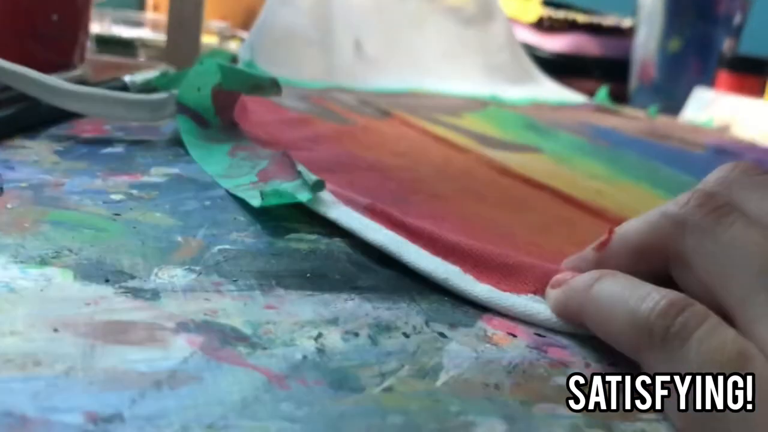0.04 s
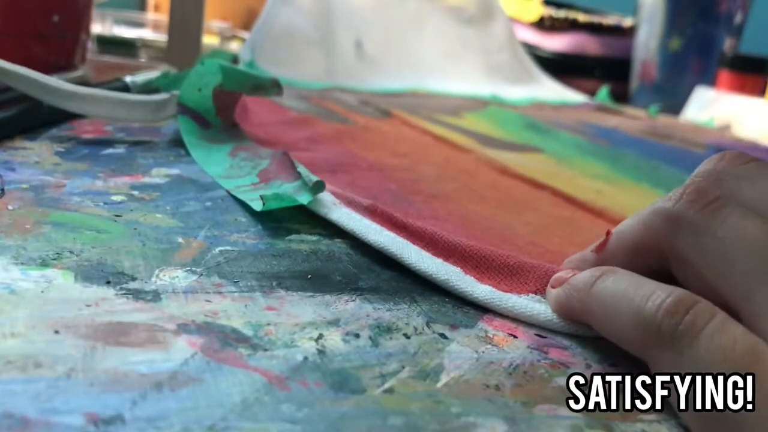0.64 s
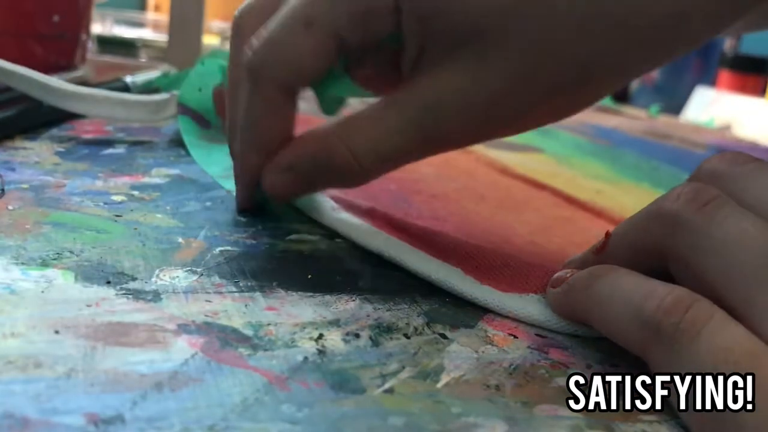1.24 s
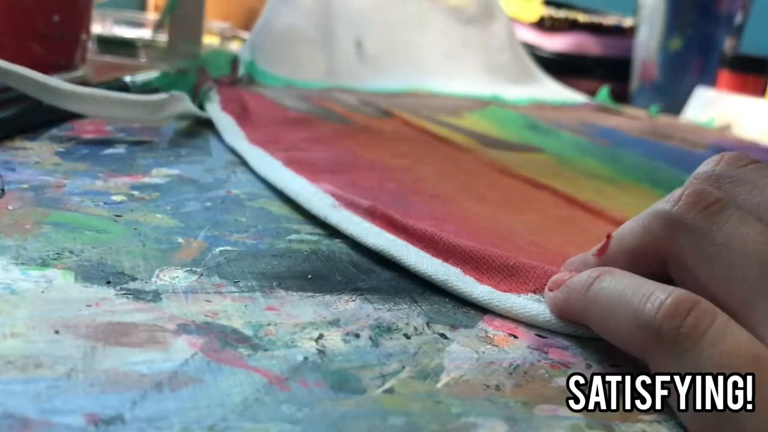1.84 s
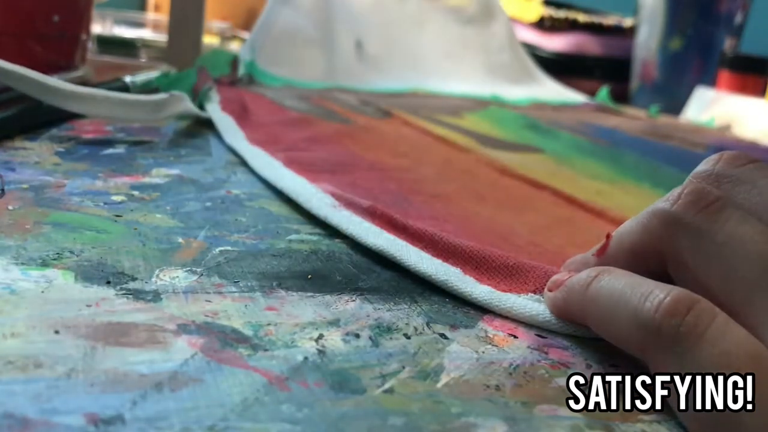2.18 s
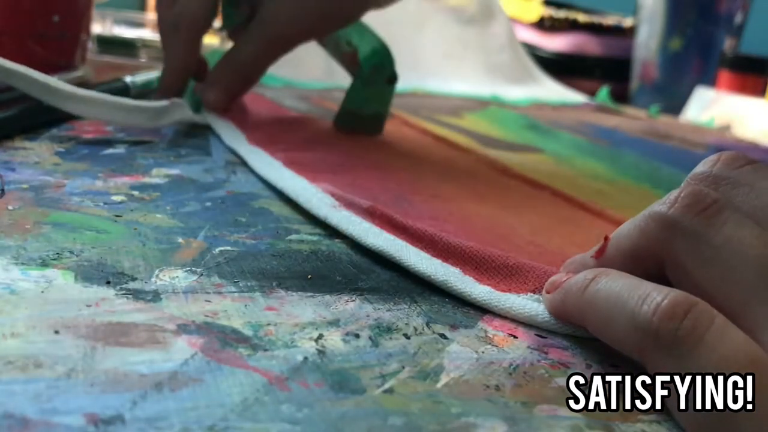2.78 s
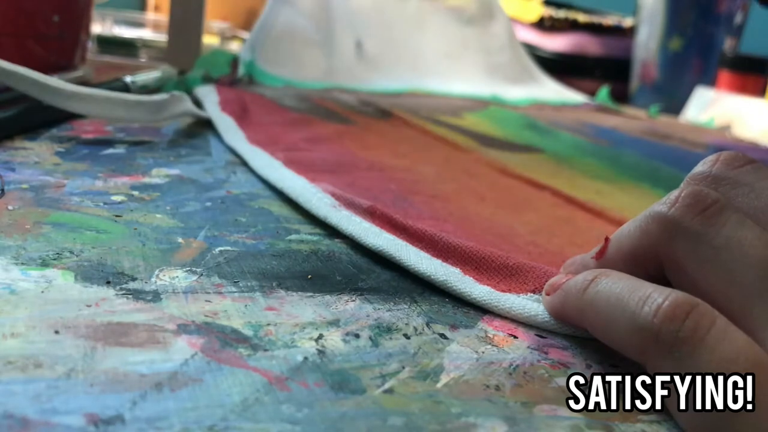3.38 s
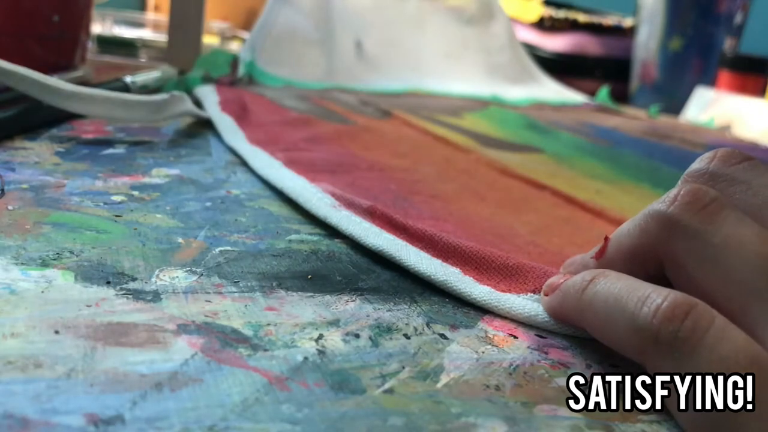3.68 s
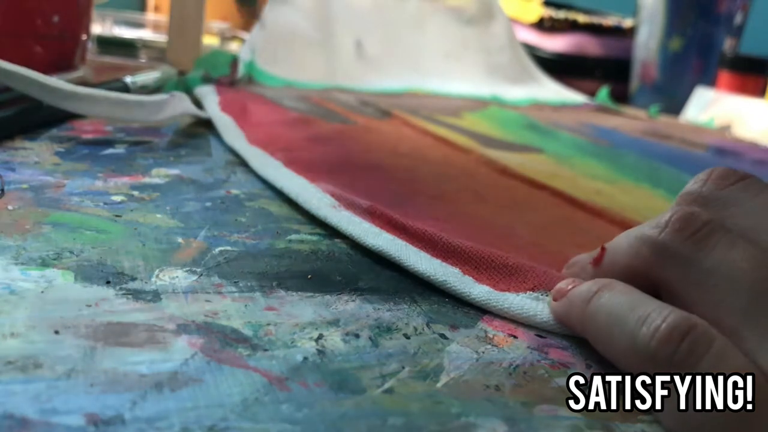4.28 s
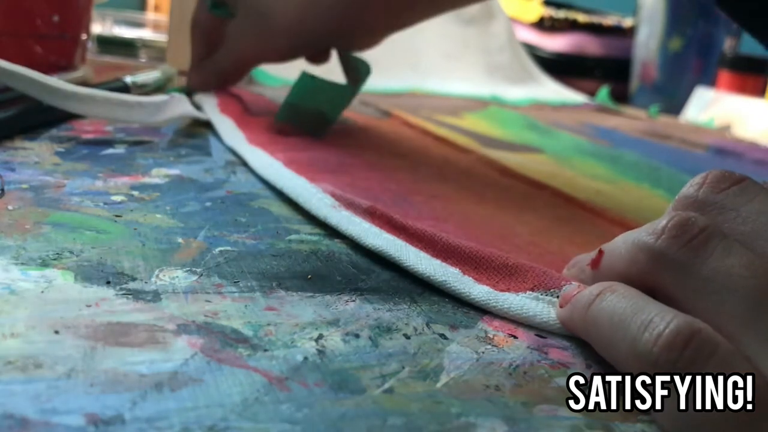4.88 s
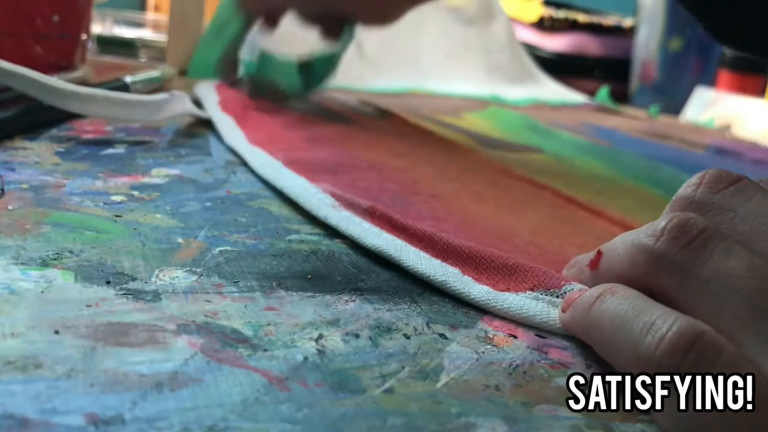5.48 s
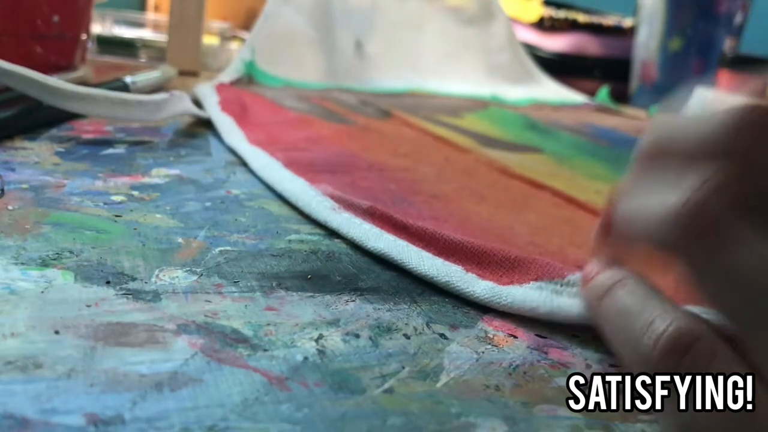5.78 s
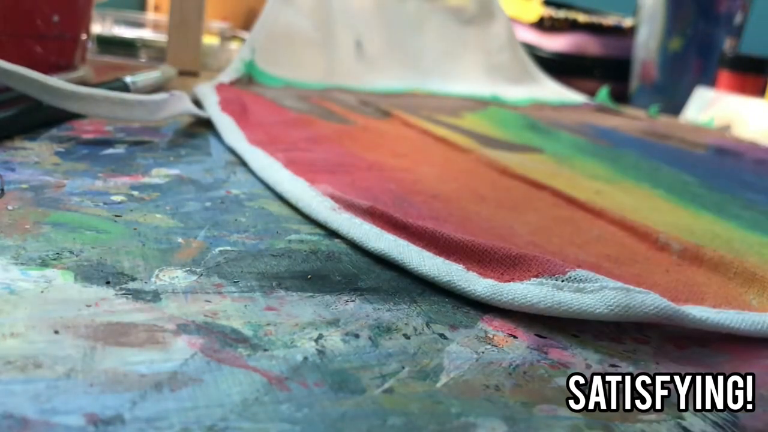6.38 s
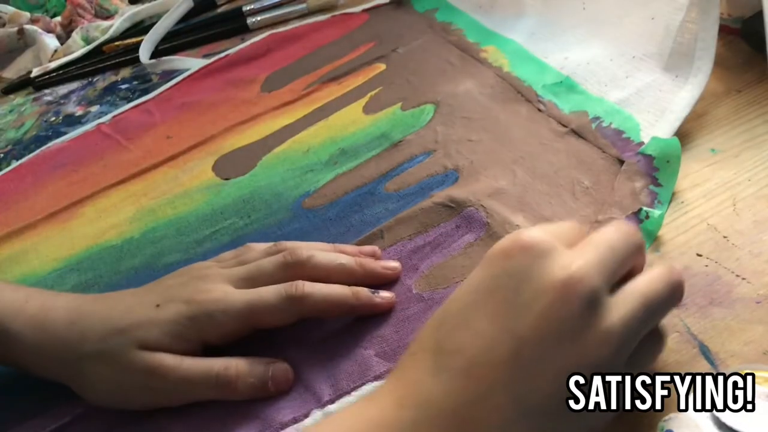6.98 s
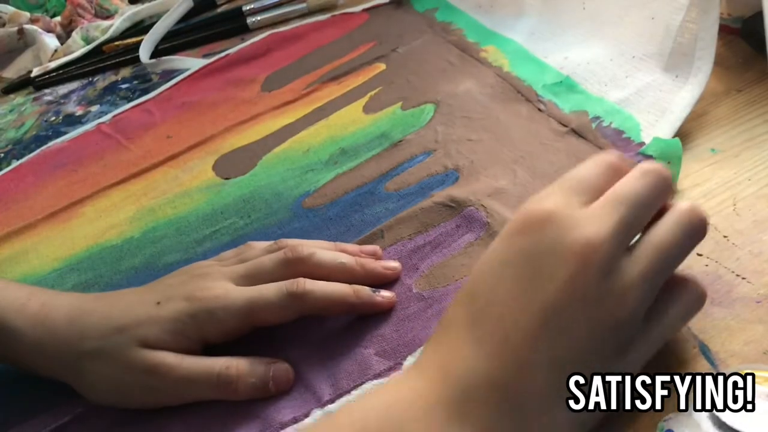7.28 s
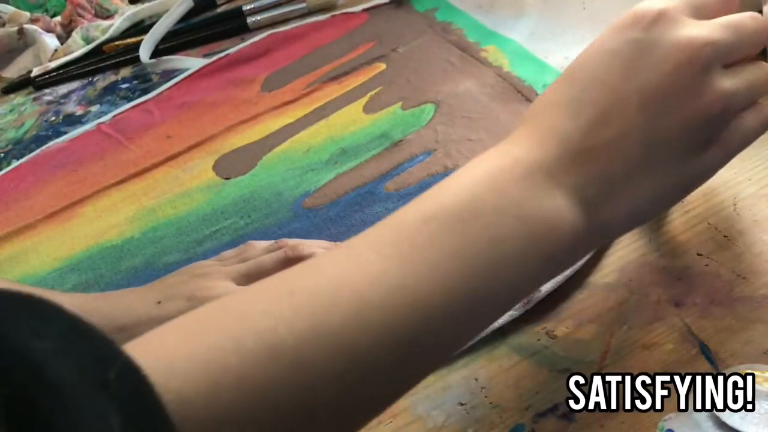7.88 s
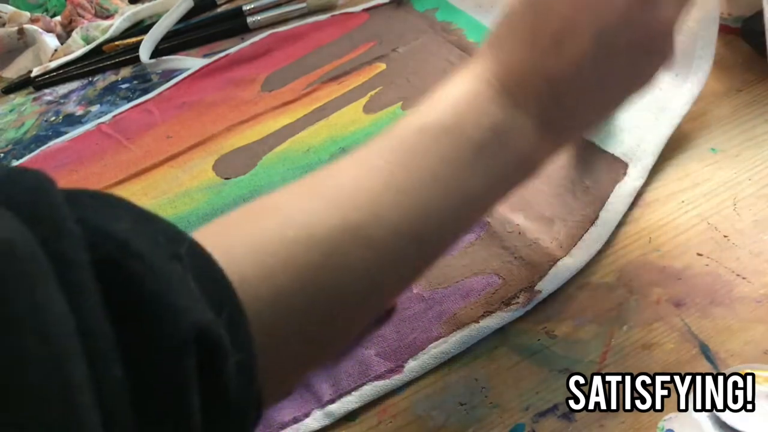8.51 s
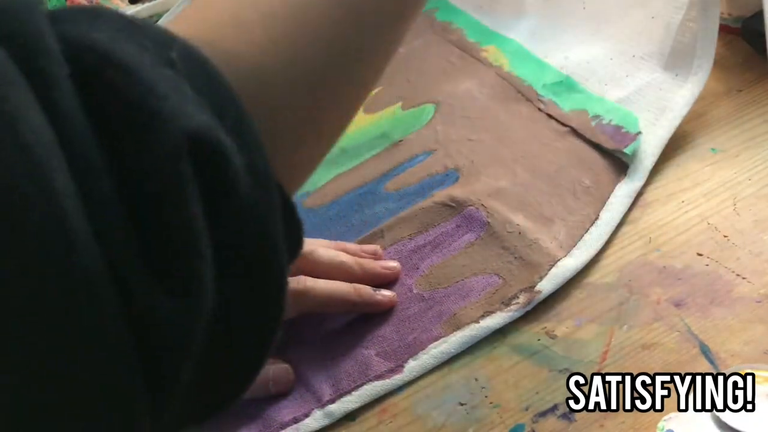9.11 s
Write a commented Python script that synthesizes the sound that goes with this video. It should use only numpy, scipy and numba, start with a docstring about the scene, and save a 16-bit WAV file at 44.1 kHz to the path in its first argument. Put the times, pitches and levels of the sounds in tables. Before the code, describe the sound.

In a quiet room with a low ventilation rumble and hum, masking tape comes off a painted canvas in stop-and-start tugs close to the microphone. Glue and dried paint crackle, the strip snaps crisply, and fingers rub the cloth, tap the canvas and bump the table. About two thirds of the way through, the sound moves farther off: a soft hiss of skin on paint, then a few weak peels and ticks.

```python
"""Scratchy crackle and sharp snaps: masking tape is picked and peeled off a painted canvas on a table.
Glue and dried paint let go in tiny slips; the stiff strip rings and snaps as it buckles.
Fingers rub the cloth, tap the canvas and bump the table, adding hiss and low thuds.
Ventilation and mains hum underlie the quiet room; the last pulls are heard from farther away."""
import sys
import numpy as np
from scipy import signal
from scipy.fft import rfft, irfft
from scipy.io import wavfile
from scipy.ndimage import uniform_filter1d
from numba import njit

SR = 44100
rng = np.random.default_rng(int(sys.argv[2]) if len(sys.argv) > 2 else 0)


def materialize(psi):
    """Save the field psi as 16-bit PCM at rate SR to the path in sys.argv[1].

    A 1-D psi becomes a single channel; in a 2-D psi each row is a channel.
    """
    bounded = np.clip(np.atleast_2d(psi).T, -1, 1)
    quanta = np.round(bounded * 32767).astype(np.int16)
    wavfile.write(sys.argv[1], SR, quanta)


N = 407925
TIME = np.arange(N) / SR

# ventilation spectrum, near spot: freq_hz, relative_db
VENT_NEAR = [(20, -39.5), (38, -9.5), (55, 6), (160, -8), (280, -5.5), (450, -15.5), (900, -19),
             (3000, -26), (16000, -29)]
# ventilation spectrum, far spot: freq_hz, relative_db
VENT_FAR = [(20, -32), (40, -2), (80, 2.5), (300, -7), (500, -15), (2500, -22), (16000, -35.5)]
# mains hum partials: freq_hz, near_db, far_db
MAINS_HUM = [(55.2, -69.5, -74), (120.7, -65, -66.5), (238.7, -68.5, -84.5)]
# hands bump the table through the cloth: start_s, level_db, pitch_hz, t60_s
TABLE_BUMPS = [(0.428, -27, 292, 0.023), (1.001, -39.5, 86, 0.27), (3.106, -41, 100, 0.21),
               (3.999, -46, 67, 0.53), (5.442, -35.5, 101, 0.15), (5.468, -47, 159, 0.37),
               (6.838, -42.5, 152, 0.12), (8.579, -41, 148, 0.068), (8.783, -45.5, 169, 0.088)]
# canvas body spectrum: freq_hz, relative_db
CANVAS_SPECTRUM = [(90, -1.5), (200, 2), (400, -0.5), (550, 1.5), (750, -0.5), (1000, 3), (2400, -4),
                   (4000, -19.5)]
# canvas springs back or is tapped: start_s, level_db
CANVAS_TAPS = [(0.4277, -46.5), (0.9643, -40), (1.868, -34.5), (1.965, -39.5), (3.158, -41.5),
               (3.8977, -48), (4.5624, -43), (8.2519, -53.5), (8.578, -51.5), (8.7794, -59)]
# spectrum of skin on paint: freq_hz, relative_db
SKIN_SPECTRUM = [(900, -7), (1900, 0.5), (5000, -5), (9500, -6), (12500, -2), (16000, -9)]
# envelope of a hand gliding over paint: time_s, level_db
GLIDE_ENVELOPE = [(6.9, -85), (6.99, -66.5), (7.14, -71), (7.21, -57.5), (7.33, -66), (7.8, -72.5),
                  (7.96, -93)]
# fingertip or loose tape end brushes the cloth: centre_s, level_db
CLOTH_BRUSHES = [(.27, -58.5), (.375, -55), (1.078, -49), (1.18, -43), (1.3, -49.5), (2.335, -54),
                 (2.555, -51.5), (2.76, -51), (2.876, -49.5), (3.356, -45.5), (3.579, -46.5), (3.905, -49),
                 (4.507, -52), (5.745, -55), (6.61, -64), (7.89, -63.5), (8.335, -57)]
# hand pulls or slides along the tape: start_s, end_s, scratch_db, swell_db, canvas_db, tilt_db_per_octave
HAND_STROKES = [(0.425, 0.514, -50, -1.5, -60.5, 1), (0.542, 0.704, -41, 13.5, -60.5, 1.5),
                (0.874, 0.934, -43, 3.5, -60.5, 2), (1.395, 1.482, -49, -1, -56.5, 3),
                (1.507, 1.595, -39.5, -1.5, -51.5, -1.7), (1.608, 1.665, -35, 0, -49, -0.5),
                (1.695, 1.86, -37.5, -1, -53, -1), (1.89, 2, -49, 3.5, -57.5, 0),
                (2.102, 2.344, -45.5, -5.5, -63.5, 0), (2.36, 2.558, -57, 7, -71.5, 2.5),
                (3.045, 3.157, -38.5, 3.5, -58.5, -1), (3.295, 3.513, -49, -6.5, -60.5, 0),
                (3.657, 3.799, -47.5, 11.5, -67.5, -0.5), (3.949, 4.133, -45.5, 10.5, -71, 0.3),
                (4.249, 4.302, -48, 5.5, -60, -0.6), (4.665, 4.846, -52.5, -6.5, -67.5, -2.5),
                (4.91, 5.105, -45.5, -1.5, -48, -1), (5.12, 5.287, -52, -4, -82, -0.5),
                (5.32, 5.403, -39.5, -0.5, -49.5, -0.3), (5.427, 5.498, -34, 2, -45.5, -0.5),
                (5.978, 5.998, -43.5, 1, -67, 0), (6.058, 6.405, -50.5, -15, -78, -1),
                (8.156, 8.41, -64.5, 11.5, -79.5, -0.5), (8.446, 8.61, -55.5, -6, -57.5, 0.5),
                (8.635, 8.705, -64.5, -5, -89, 0.2), (9.085, 9.108, -60.5, -3, -71.5, -0.5)]
# strip rings where taut: start_s, end_s, first_hz, last_hz, width_hz, boost_db
# the negative row is a hollow dip near 2.5 kHz heard at the far spot
STRIP_MODES = [(0.477, 0.732, 3320, 4670, 2070, 10.5), (0.467, 0.776, 5600, 5700, 3000, 10.5),
               (1.755, 1.789, 5900, 5440, 1400, 10), (1.792, 1.87, 3400, 2900, 1700, 8),
               (3.034, 3.117, 3500, 3870, 1100, 10), (3.09, 3.184, 1850, 1890, 795, 5),
               (3.944, 4.222, 2380, 3250, 900, 11), (4.225, 4.28, 3600, 4000, 900, 8),
               (4.283, 4.338, 1900, 4140, 1100, 11.5), (4.633, 5.58, 3870, 4400, 900, 5),
               (5.45, 5.605, 6100, 6550, 1700, 7), (6.034, 6.125, 1900, 2200, 1500, 5.5),
               (6.014, 6.42, 2520, 2620, 1100, 7), (6.942, 7.703, 2600, 4000, 1200, 4.5),
               (7.598, 8.452, 5980, 6000, 1390, 7), (7.901, 8.951, 2500, 2520, 3000, -8),
               (9.059, 9.15, 3480, 3230, 1400, 11)]
# tape and paint crust buckle: start_s, level_db (crack energy taken over 1 ms), pitch_hz
BUCKLE_SNAPS = [(0.4283, -37.5, 6040), (0.487, -26, 5560), (0.588, -31, 5270), (0.868, -34, 7500),
                (.905, -27.5, 7200), (0.9652, -22.5, 5500), (0.9722, -33, 3260), (1.198, -40, 1900),
                (1.3642, -25.5, 3180), (1.3702, -28, 2550), (1.384, -30, 4200), (1.493, -29, 7500),
                (1.516, -29, 5350), (1.537, -21, 5440), (1.608, -26.5, 6050), (1.655, -25, 2320),
                (1.7311, -20.5, 5000), (1.7659, -25, 5850), (1.772, -24.5, 7500), (1.8085, -25, 3370),
                (1.872, -24, 2800), (1.9648, -22, 8050), (1.976, -30, 3500), (2.0945, -22.5, 9050),
                (2.2036, -25, 7100), (2.24, -33.5, 5080), (2.446, -38, 6800), (2.704, -38, 6800),
                (3.0613, -27.5, 3540), (3.101, -25.5, 4820), (3.1216, -18.5, 4800), (3.157, -25, 3730),
                (3.231, -34.5, 5140), (3.326, -35.5, 2620), (3.4289, -32.5, 1850), (3.454, -34.5, 1700),
                (3.51, -34, 2500), (3.587, -40, 3400), (3.754, -25, 7770), (3.831, -32, 6100),
                (3.8976, -27, 5600), (3.9642, -31.5, 4570), (4.008, -38, 3800), (4.106, -29, 5470),
                (4.2639, -35.5, 3020), (4.2886, -35.5, 2500), (4.3133, -33.5, 4000), (4.4157, -36.5, 2360),
                (4.5619, -30, 1640), (4.654, -33, 7030), (4.6778, -34, 7400), (4.853, -31.5, 4700),
                (4.892, -31.5, 4570), (4.968, -32, 3400), (4.9827, -27.5, 4350), (5.0167, -29.5, 4380),
                (5.275, -31, 2650), (5.2926, -25.5, 2600), (5.296, -30, 2610), (5.3401, -34, 980),
                (5.358, -34.5, 7000), (5.3744, -24.5, 2070), (5.3812, -28.5, 8000), (5.442, -30.5, 4300),
                (5.473, -25, 4370), (5.505, -32, 2200), (5.646, -45.5, 1500), (5.705, -39.5, 2500),
                (5.987, -31.5, 4530), (6.0587, -34, 2300), (6.0956, -29, 3100), (6.194, -36.5, 4800),
                (6.812, -48.5, 1365), (6.8377, -46.5, 990), (7.84, -54, 5500), (8.2531, -40, 3340),
                (8.4444, -41.5, 3600), (8.498, -41, 4160), (8.5559, -37.5, 5450), (8.5769, -33, 3100),
                (8.7806, -40.5, 4100), (9.0606, -40.5, 4420)]
# a glue patch gives way at once: start_s, length_s, level_db
GLUE_RIPS = [(.637, 0.0062, -28), (1.823, 0.018, -30), (1.856, 0.021, -28), (3.112, 0.0096, -24),
             (3.256, 0.016, -33), (3.763, 0.032, -34.5), (5.313, 0.012, -36), (5.512, 0.03, -36),
             (6.124, 0.016, -35)]
# tape scratch spectrum: freq_hz, relative_db
SCRATCH_SPECTRUM = [(900, -15.5), (1400, -9), (2000, -4), (4200, 0), (6500, -2), (9000, 0), (12000, -1.5),
                    (16000, -4)]
# microphone peaks and dips: centre_hz, width_hz, gain_db
MIC_BANDS = [(5000, 350, -2.5), (5970, 930, 2.5), (10420, 630, -5)]

MOVE_S = 6.493   # listening spot goes from near to far
ROOM_T60_S, CUTOFF_HZ = 0.18, 16000
GRIP_S, RELEASE_DB_PER_S = 0.042, 294
BRUSH_HALF_WIDTH_S, BRUSH_CANVAS_REL_DB = 0.019, -7
REST_NEAR_DB, REST_FAR_DB, REST_CANVAS_REL_DB = -73.5, -78, -4.5   # the holding hand is never quite still
TILT_PIVOT_HZ = 5520   # nails scratch brighter, fingertips duller


def from_db(db):
    """Decibels to gain."""
    return 10 ** (np.asarray(db) / 20)


def unit_rms(x):
    """Scale to unit power."""
    return x / np.sqrt(np.mean(x ** 2) + 1e-20)


def drift(rate_hz):
    """Smooth random wander, unit power."""
    knots = rng.standard_normal(20000)
    return unit_rms(np.interp(TIME * rate_hz, np.arange(len(knots)), knots))


def bandpass(x, low_hz, high_hz, order=1):
    """Causal Butterworth band-pass."""
    sos = signal.butter(order, [low_hz, min(high_hz, .45 * SR)], "band", fs=SR, output="sos")
    return signal.sosfilt(sos, x)


def colour(x, spectrum):
    """Minimum-phase filter with the given spectrum; output at unit power."""
    size = 8192
    hz, db = np.transpose(spectrum)
    grid_hz = np.maximum(np.fft.rfftfreq(size, 1 / SR), 1)
    gain = from_db(np.interp(np.log(grid_hz), np.log(hz), db)) * np.minimum(grid_hz / hz[0], 1) ** 2
    cepstrum = irfft(np.log(gain))[:size // 2]
    cepstrum[1:] *= 2
    impulse = irfft(np.exp(rfft(cepstrum, size)))[:size // 2]
    return unit_rms(signal.fftconvolve(x, impulse)[:N])


@njit
def resonate(x, hz, width_hz):
    """Unity-gain resonator with a moving centre."""
    r, y = np.exp(-np.pi * width_hz / SR), np.zeros(len(x))
    for i in range(2, len(x)):
        drive = (1 - r * r) / 2 * (x[i] - x[i - 2])
        y[i] = drive + 2 * r * np.cos(2 * np.pi * hz[i] / SR) * y[i - 1] - r * r * y[i - 2]
    return y


def slips(per_s, spread_db, decay_s):
    """Stick-slip power, mean 1: sudden releases of uneven size, each dying fast."""
    onsets = np.flatnonzero(rng.random(N) < per_s / SR)
    kicks = np.full(N, 1e-18)
    kicks[onsets] = from_db(spread_db * np.minimum(rng.exponential(1, len(onsets)), 4)) ** 2
    power = signal.lfilter([1], [1, -np.exp(-1 / (decay_s * SR))], kicks)
    return power / power.mean()


def vent_and_hum():
    """Ventilation rumble and wavering mains hum, both weaker at the far spot."""
    near = TIME < MOVE_S
    vent_near = from_db(-57.5) * colour(rng.standard_normal(N), VENT_NEAR)
    vent_far = from_db(-69.5) * colour(rng.standard_normal(N), VENT_FAR)
    out = np.where(near, vent_near, vent_far)
    for hz, near_db, far_db in MAINS_HUM:
        rms = from_db(np.where(near, near_db, far_db) + 2.4 * drift(5))
        out += np.sqrt(2) * rms * np.sin(2 * np.pi * hz * TIME + 0.084 * drift(1.5))
    return out


def room_tail(x):
    """Diffuse reflections from the table and nearby walls."""
    t = TIME[:SR // 2]
    tail = bandpass(rng.standard_normal(len(t)), 140, 9000) * from_db(-60 * t / ROOM_T60_S) * (t > .003)
    return signal.fftconvolve(x, tail / np.sqrt(np.sum(tail ** 2)))[:N]


def table_bumps(rise_s, overtone_ratio):
    """Soft contacts ring two low table-top modes; the upper dies first."""
    out, t = np.zeros(N + SR), TIME[:SR // 2]
    for start_s, level_db, hz, t60_s in TABLE_BUMPS:
        onset = int(start_s * SR)
        decay, phase = from_db(-60 * t / t60_s), 2 * np.pi * hz * t
        modes = decay * np.sin(phase) + decay ** 2 * np.sin(overtone_ratio * phase)
        out[onset:onset + len(t)] += from_db(level_db) * (1 - np.exp(-t / rise_s)) * modes
    return out[:N]


def canvas_taps(decay_s):
    """Short, dull thuds in the stretched canvas."""
    thuds, t = np.zeros(N), TIME[:SR // 10]
    for start_s, level_db in CANVAS_TAPS:
        onset = int(start_s * SR)
        thuds[onset:onset + len(t)] += from_db(level_db) * np.exp(-t / decay_s) * rng.standard_normal(len(t))
    return thuds.std() * colour(thuds, CANVAS_SPECTRUM)


def skin_glide():
    """Skin on paint: soft hiss that follows hand speed and ticks at ridges."""
    time_s, level_db = np.transpose(GLIDE_ENVELOPE)
    speed = from_db(np.interp(TIME, time_s, level_db)) * (TIME > time_s[0]) * (TIME < time_s[-1])
    ridges = np.sqrt(1 + from_db(-1.5) * slips(per_s=110, spread_db=3.5, decay_s=0.0013))
    return speed * colour(ridges * rng.standard_normal(N), SKIN_SPECTRUM)


def hand_envelopes():
    """Scratch gain, canvas gain and tilt: resting hand, strokes and brushes add in power."""
    scratch_power = from_db(np.where(TIME < MOVE_S, REST_NEAR_DB, REST_FAR_DB)) ** 2
    canvas_power = scratch_power * from_db(REST_CANVAS_REL_DB) ** 2
    weighted_tilt = np.zeros(N)
    for start_s, end_s, scratch_db, swell_db, canvas_db, tilt_db_per_octave in HAND_STROKES:
        span = slice(int((start_s - GRIP_S) * SR), int(end_s * SR) + SR // 4)
        t = TIME[span]
        grip = np.clip(1 + (t - start_s) / GRIP_S, 0, 1)
        envelope = grip * from_db(-RELEASE_DB_PER_S * np.maximum(t - end_s, 0))
        progress = np.clip((t - start_s) / (end_s - start_s), 0, 1)
        power = (envelope * from_db(scratch_db + swell_db * (progress - .5))) ** 2
        scratch_power[span] += power
        weighted_tilt[span] += power * tilt_db_per_octave
        canvas_power[span] += (envelope * from_db(canvas_db)) ** 2
    for centre_s, level_db in CLOTH_BRUSHES:
        span = slice(int(centre_s * SR) - SR // 8, int(centre_s * SR) + SR // 8)
        power = (from_db(level_db) / (1 + ((TIME[span] - centre_s) / BRUSH_HALF_WIDTH_S) ** 2)) ** 2
        scratch_power[span] += power
        canvas_power[span] += power * from_db(BRUSH_CANVAS_REL_DB) ** 2
    return np.sqrt(scratch_power), np.sqrt(canvas_power), weighted_tilt / scratch_power


def strip_ring(x, overtone_ratio, overtone_db):
    """The strip's bending mode and overtone reshape the sound without adding power."""
    out = x.copy()
    for start_s, end_s, first_hz, last_hz, width_hz, boost_db in STRIP_MODES:
        span = slice(int(start_s * SR), int(end_s * SR))
        part = x[span]
        hz = np.linspace(first_hz, last_hz, len(part))
        fade = signal.windows.tukey(len(part), .3)
        for ratio, gain in [(1.0, 1), (overtone_ratio, from_db(overtone_db))]:
            ring = resonate(resonate(part, hz * ratio, width_hz * ratio), hz * ratio, width_hz * ratio)
            out[span] += gain * (from_db(boost_db) - 1) * ring * fade
    return out * np.sqrt(uniform_filter1d(x ** 2, size=900) / uniform_filter1d(out ** 2, size=900))


def buckle_snaps(crack_cycles, flutter_s, flutter_db, band_ratio, ring_db, ring_cycles, knock_s):
    """Each fold cracks, flutters and rings; big folds are slower and knock harder on the canvas."""
    cracks, knocks, t = np.zeros(N), np.zeros(N), TIME[:1500]
    for start_s, level_db, hz in BUCKLE_SNAPS:
        span = slice(int(start_s * SR), int(start_s * SR) + len(t))
        age = t * hz / crack_cycles
        envelope = age * np.exp(1 - age) + from_db(flutter_db) * np.exp(-t / flutter_s)
        snap = bandpass(envelope * rng.standard_normal(len(t)), hz / band_ratio, hz * band_ratio)
        ring = np.sin(2 * np.pi * hz * t) * np.exp(-t * hz / ring_cycles)
        snap += np.abs(snap).max() * from_db(ring_db) * ring
        energy = np.sum(snap[:SR // 250] ** 2) / (SR / 1000)   # first 4 ms, taken over 1 ms
        cracks[span] += from_db(level_db) * snap / np.sqrt(energy)
        knock_gain = from_db(level_db - 21) * np.sqrt(3000 / hz)
        knocks[span] += knock_gain * np.exp(-t / knock_s) * rng.standard_normal(len(t))
    return cracks, knocks.std() * colour(knocks, CANVAS_SPECTRUM)


def glue_crackle(force, tilt_db_per_octave, stickiness, fold_share, patchy_db):
    """Crackle and pull: big slips span all bands, small folds one; with no sticking the slide is smooth."""
    edges_hz, crackle = np.geomspace(700, 17000, num=13), 0
    big_slips = slips(per_s=420, spread_db=5.0, decay_s=0.001)
    for low_hz, high_hz in zip(edges_hz, edges_hz[1:]):
        folds = slips(per_s=260, spread_db=6.0, decay_s=0.0016)
        grain = (1 - fold_share) * big_slips + fold_share * folds
        octaves = np.log2(np.sqrt(low_hz * high_hz) / TILT_PIVOT_HZ)
        band_gain = from_db(patchy_db * drift(22) + tilt_db_per_octave * octaves)
        drive = force * np.sqrt(1 - stickiness + stickiness * grain) * band_gain
        crackle += bandpass(drive * rng.standard_normal(N), low_hz, high_hz, order=2)
    return crackle, force * np.sqrt(1 - stickiness + stickiness * big_slips)


def tape_peel():
    """Tape scratch and canvas body: a harder glue tug gives more crackle and more canvas."""
    effort, canvas_gain, tilt_db_per_octave = hand_envelopes()
    force = effort * from_db(1.9 * drift(70))
    for start_s, length_s, level_db in GLUE_RIPS:
        progress = np.clip((TIME - start_s) / length_s, 0, 1)
        force = np.hypot(force, from_db(level_db) * np.sqrt(np.abs(np.sin(np.pi * progress))))
    tug = canvas_gain / effort
    stickiness = tug / (tug + from_db(-25.5))
    crackle, pull = glue_crackle(force, tilt_db_per_octave, stickiness, fold_share=0.35, patchy_db=2.5)
    scratch = from_db(-0.29) * np.sqrt(np.mean(force ** 2)) * colour(crackle, SCRATCH_SPECTRUM)
    body = tug * pull * rng.standard_normal(N)
    return scratch, from_db(-1.8) * body.std() * colour(body, CANVAS_SPECTRUM)


def scene():
    """Scratch, cracks and glide ring in one strip; canvas and table add the lows; all share the room."""
    scratch, body = tape_peel()
    cracks, knocks = buckle_snaps(crack_cycles=1.06, flutter_s=0.0049, flutter_db=-8, band_ratio=1.74,
                                  ring_db=-13.5, ring_cycles=4.1, knock_s=0.0043)
    tape = strip_ring(scratch + cracks + skin_glide(), overtone_ratio=2.25, overtone_db=-15.5)
    canvas = body + knocks + canvas_taps(decay_s=0.0095)
    direct = tape + canvas + table_bumps(rise_s=0.0079, overtone_ratio=1.8)
    return (direct + from_db(-17) * room_tail(direct) + vent_and_hum())[None]


def record(dry):
    """Small microphone: one peak, two dips, steep treble cut."""
    for hz, width_hz, gain_db in MIC_BANDS:
        band = signal.lfilter(*signal.iirpeak(hz, hz / width_hz, fs=SR), dry)
        dry = dry + (from_db(gain_db) - 1) * band
    return signal.sosfilt(signal.ellip(12, .2, 80, CUTOFF_HZ, fs=SR, output="sos"), dry)


dry = scene()
out = record(dry)
materialize(out)
```